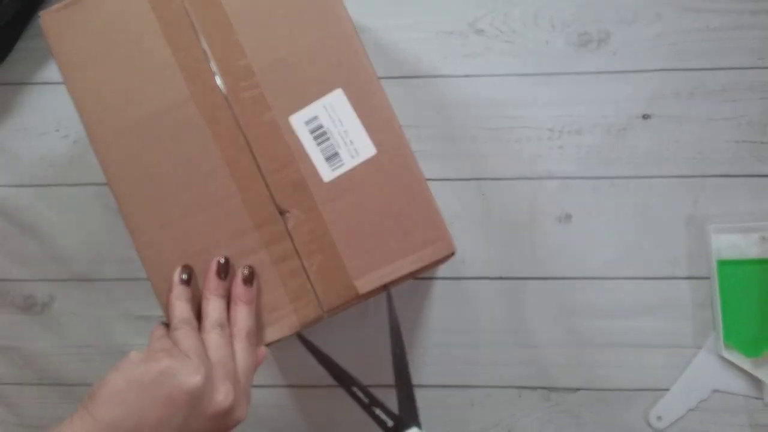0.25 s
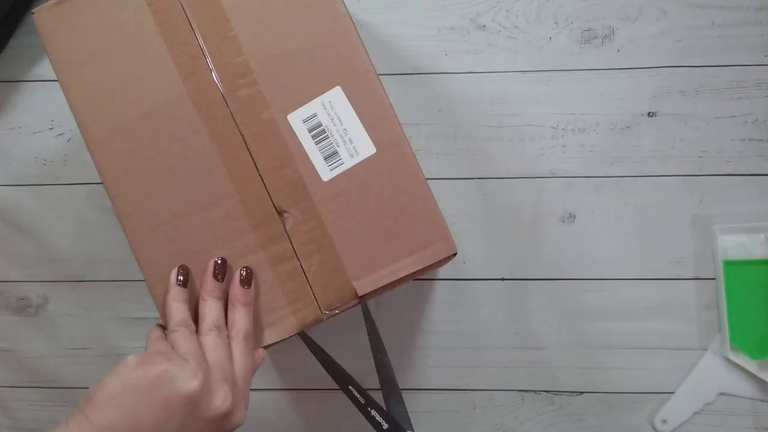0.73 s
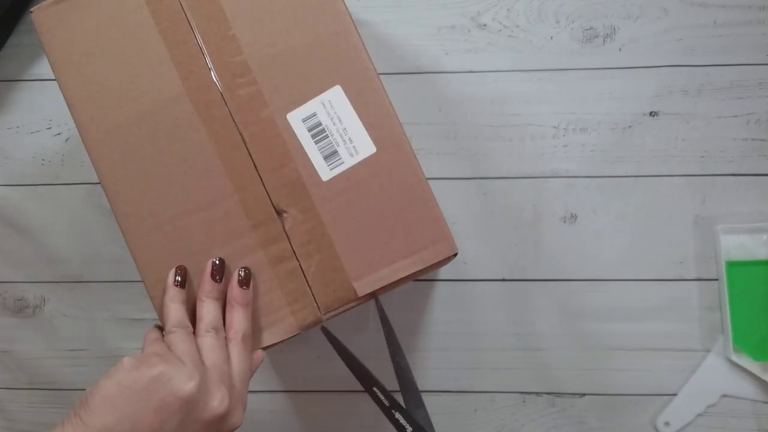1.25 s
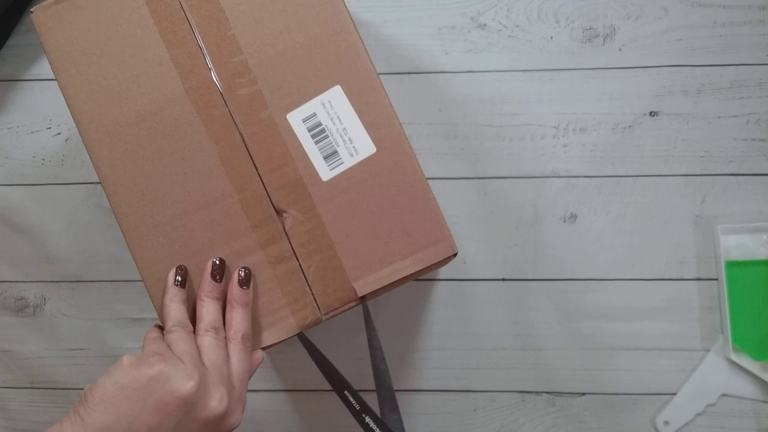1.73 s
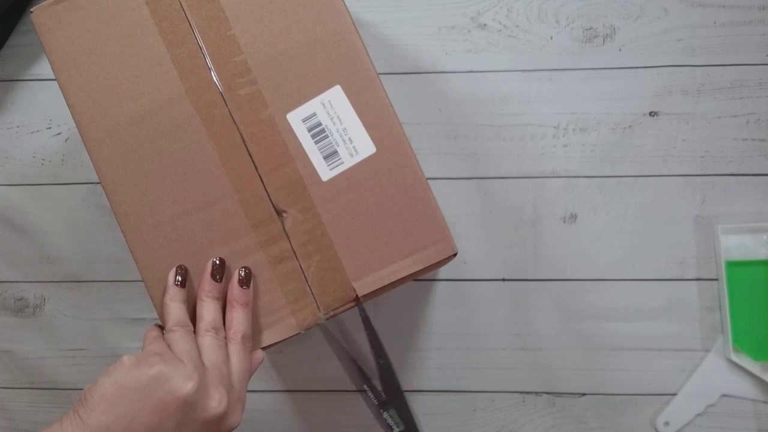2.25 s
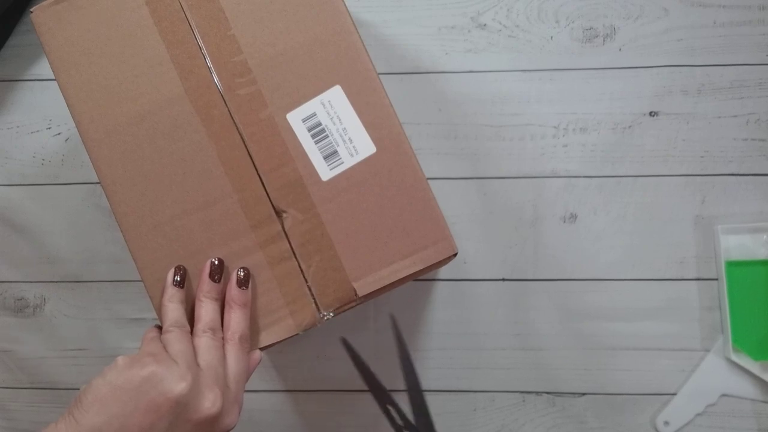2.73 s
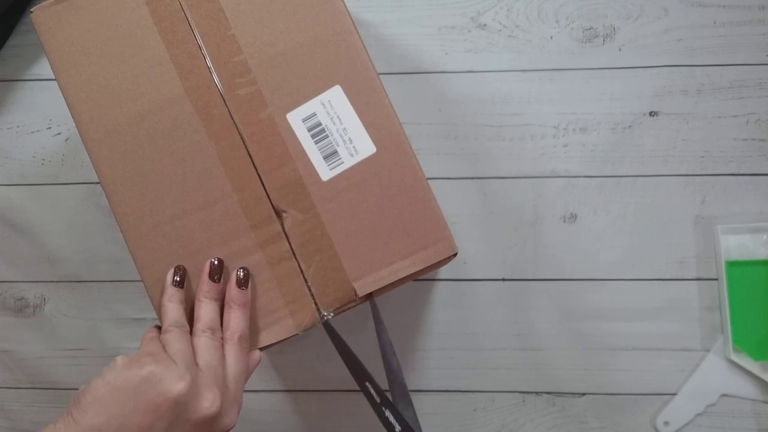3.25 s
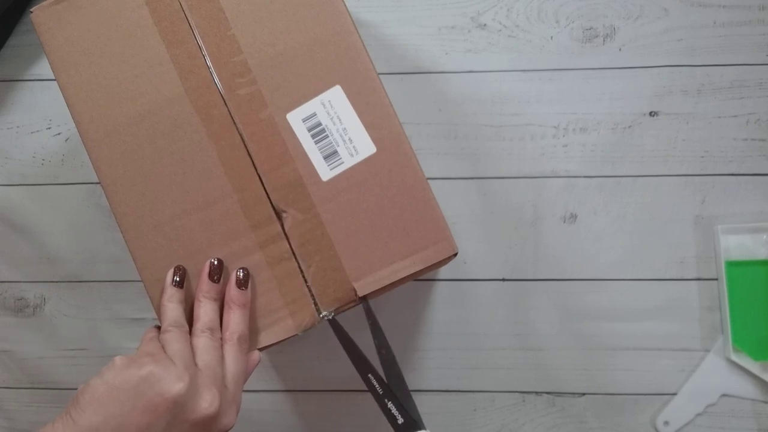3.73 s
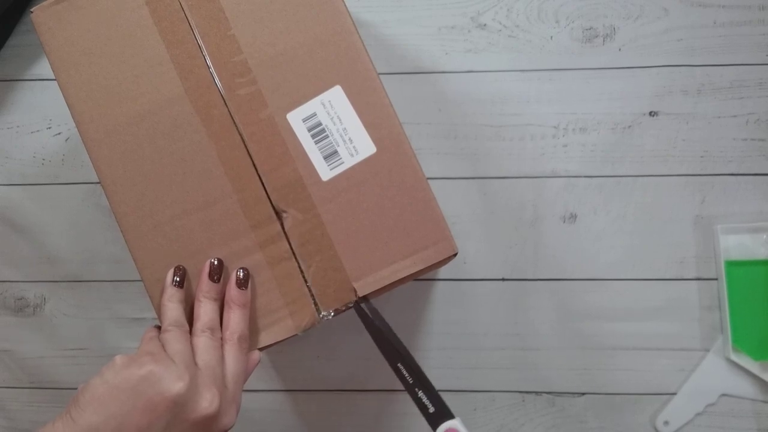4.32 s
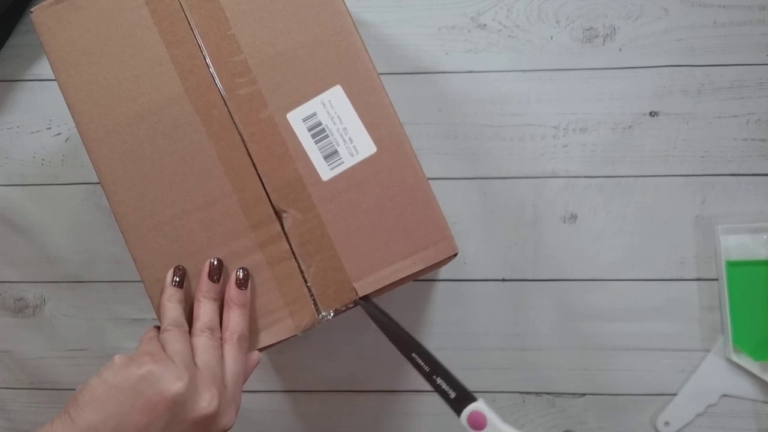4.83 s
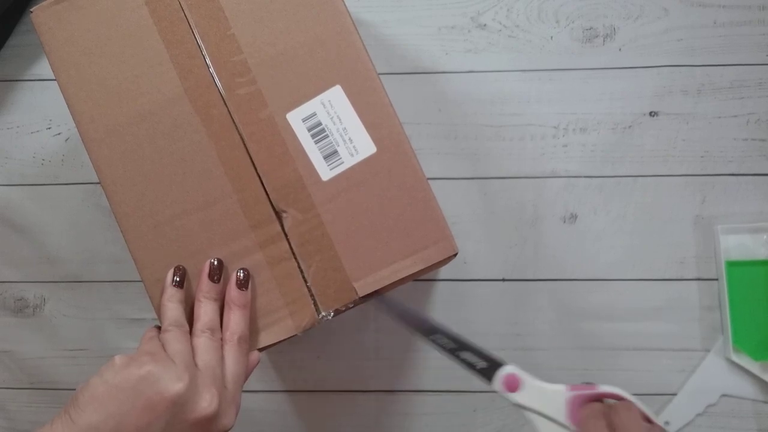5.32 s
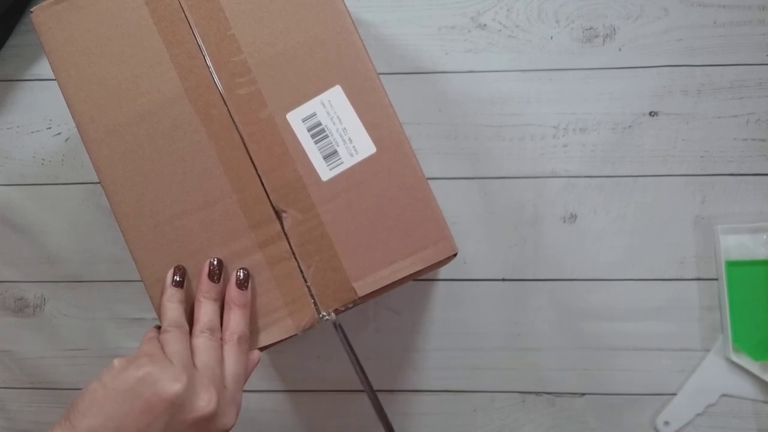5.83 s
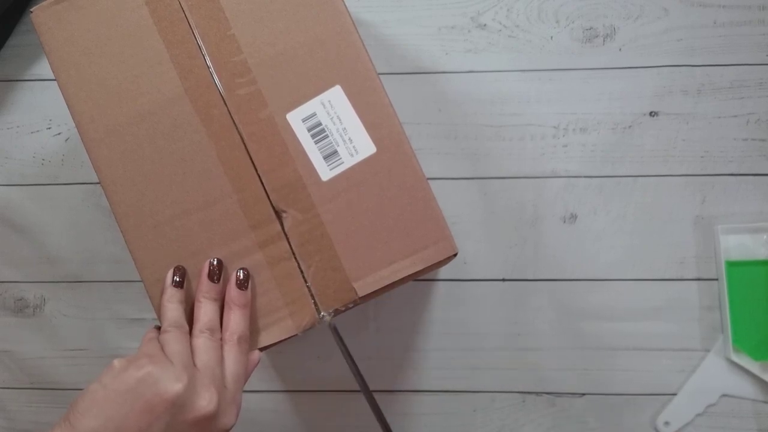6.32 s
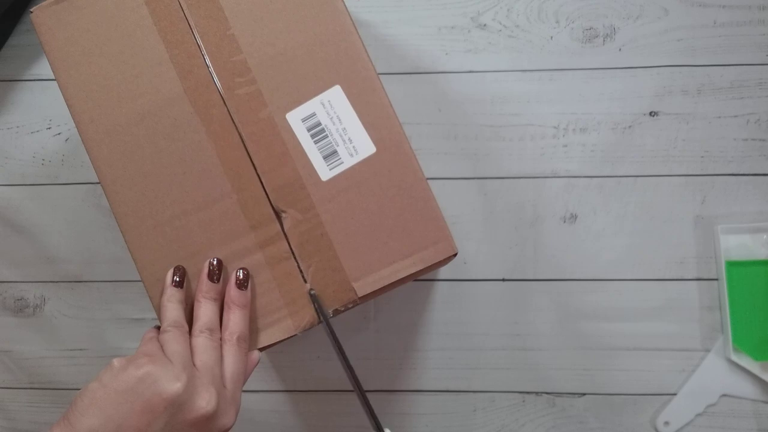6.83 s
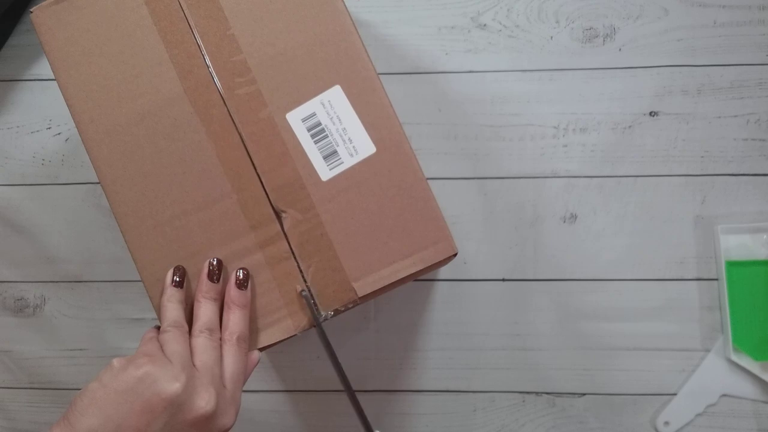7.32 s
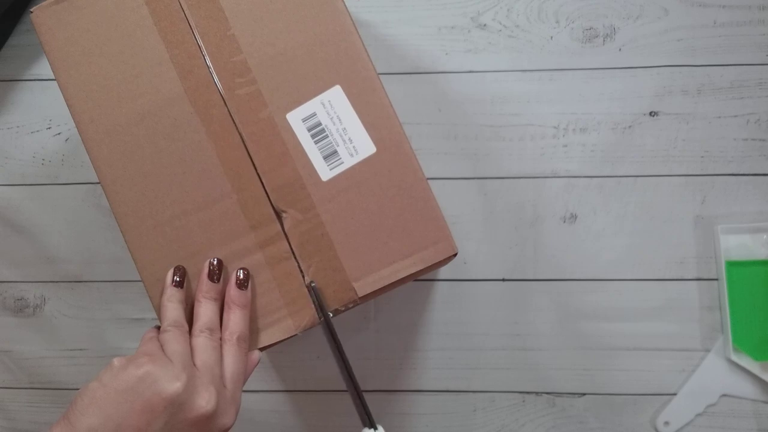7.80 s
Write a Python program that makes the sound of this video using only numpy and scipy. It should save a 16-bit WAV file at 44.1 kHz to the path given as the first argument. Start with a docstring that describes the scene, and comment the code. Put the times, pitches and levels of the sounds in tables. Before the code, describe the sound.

Sparse, irregular cutting at a cardboard box: bright metallic snips with tiny chatter, gritty snaps of tape, blunt hollow thuds and faint rubbing. Activity is strongest in the first half, then thins to isolated blade ticks and fine seam rasps. Close, dry indoor pickup with light hiss, short room reflections and a muffled engine rising and shifting outside.

```python
"""Scissors snip and slit the packing tape of a cardboard box, close up in a small room.
Steel blades click as short hard contacts with chatter; tape and card crunch as showers of tiny snaps.
Each force sounds through filters for box, card, cutting edge and tape, and blunt knocks ring the hollow box.
Behind them are thin squeaks, a faint rub of the hand and still air with microphone hiss.
Outside, a car pulls away through its gears: sine lines on the engine speed, a low hum through the wall."""
import sys
import numpy as np
from scipy import signal
from scipy.fft import rfft, irfft, next_fast_len
from scipy.io import wavfile
from scipy.ndimage import uniform_filter1d, map_coordinates

SR = 44100
rng = np.random.default_rng(int(sys.argv[2]) if len(sys.argv) > 2 else 0)


def dump(signal):
    """Clip the signal to [-1, 1] and save it as 16-bit WAV at the path in sys.argv[1]."""
    limited = np.clip(np.atleast_2d(signal).T, -1, 1)
    pcm = np.round(limited * 32767).astype(np.int16)
    wavfile.write(sys.argv[1], SR, pcm)


N = 355446  # length [samples]


def scissors():
    """All the cutting and rubbing strokes: each is a shower of snaps under its own pressure curve."""
    return bites() + drags() + rubs() + slides() + slits()


# the blades bite through tape and card:
# (start [s], length [s], card level [dB], edge level over card [dB])
BITE_STROKES = [(.739, 0.027, -46, -4.5), (.935, .03, -41.5, 0.5), (1.255, .02, -51, -13),
                (2.106, 0.058, -42.5, -9), (2.341, 0.023, -30.5, -3), (3.219, .05, -50, -12.5),
                (3.914, .022, -40.5, 2.5), (4.112, 0.0379, -55.5, 1.5), (5.093, .012, -52, 1)]


def bites():
    """Pressure peaks early and collapses, with a strong share of box."""
    return strokes(BITE_STROKES, rise=0.12, rate=1200, card_hz=1530, box_db=4.0, fizz_db=-8,
                   low_hz=40, sag=0.074, spread_db=4, surface=CARD_TONE)


# the blades drag through crumpling tape:
# (start [s], length [s], card level [dB], edge level over card [dB])
DRAG_STROKES = [(4.135, .1, -54.5, 0.5), (5.1, .025, -60.5, -8), (5.397, .105, -43, 0.5)]


def drags():
    """Pressure swells over a dense shower of snaps."""
    return strokes(DRAG_STROKES, rise=0.22, rate=2600, card_hz=2030, box_db=-1.5, fizz_db=-3.5,
                   low_hz=226, sag=0.14, spread_db=3, surface=CARD_TONE)


# the flat of a blade rubs the box:
# (start [s], length [s], card level [dB], edge level over card [dB])
RUB_STROKES = [(.461, 0.025, -61.5, -7), (.559, .026, -67, -3), (.628, 0.063, -72, 0.5),
               (1.05, .025, -64, -5), (1.187, 0.029, -60.5, -1.5), (1.573, 0.082, -64.5, -12.5),
               (1.875, 0.06, -75, -2.5), (1.97, 0.025, -65, -1), (2.06, 0.067, -60.5, -6),
               (2.17, .13, -64.5, -4.5), (2.31, .04, -56.5, -2.5), (3.48, .04, -65, -2),
               (3.713, 0.022, -68, 3), (3.84, 0.096, -70, -0.5), (4.113, .12, -56.5, -10),
               (4.304, .166, -71.5, -6), (4.64, .07, -73.5, 2), (6.226, .024, -75.5, 0),
               (7.297, 0.068, -70.5, 1), (7.42, .05, -72, -5)]


def rubs():
    """Dull, sparse snaps of very uneven size, heard mostly through the box."""
    return strokes(RUB_STROKES, rise=0.22, rate=1200, card_hz=1100, box_db=6.5, fizz_db=-4.0,
                   low_hz=171, sag=0.28, spread_db=5.5, surface=CARD_TONE)


# one blade slides over the other:
# (start [s], length [s], card level [dB], edge level over card [dB])
SLIDE_STROKES = [(.675, 0.029, -67, 11), (2.484, .022, -42.5, 2.5), (3.413, 0.046, -71, 9.5),
                 (3.529, 0.032, -57, 11), (5.644, .03, -68.5, 14.5)]


def slides():
    """Pressure swells to the middle of the stroke and fades; the snaps are fine and even."""
    return strokes(SLIDE_STROKES, rise=.5, rate=3000, card_hz=2100, box_db=-3, fizz_db=-10,
                   low_hz=200, sag=0.079, spread_db=2.5, surface=CARD_TONE)


# one blade slits along the seam:
# (start [s], length [s], card level [dB], edge level over card [dB])
SLIT_STROKES = [(6.592, .13, -56.5, 0.5), (6.71, .21, -57.5, -7.5), (7.297, 0.17, -66.5, -6),
                (7.81, .06, -57.5, -3), (7.94, .02, -66, -6)]
# rasp of the taut tape over the seam: (frequency [Hz], relative level per Hz [dB])
SEAM_TONE = [(400, -21.5), (750, 13), (1100, 5.5), (1500, -2.5), (1750, -6), (2100, -7.5), (2400, 4.5),
             (2750, 5), (3080, -7), (3500, 3.5), (4000, -8.5), (6500, -27)]


def slits():
    """A fine, fast rasp through the taut tape that starts at once and tires."""
    return strokes(SLIT_STROKES, rise=0.028, rate=4500, card_hz=2060, box_db=-7, fizz_db=-7.5,
                   low_hz=130, sag=0.32, spread_db=4, surface=SEAM_TONE)


def strokes(rows, rise, rate, card_hz, box_db, fizz_db, low_hz, sag, spread_db, surface,
            hiss=0.01276, release=.004, count=3):
    """Fibres and tape give way in tiny uneven snaps at count spots; the faster they come, the more steel hiss.

    Pressure peaks after the share rise of a stroke and sags to the share sag, then lets go in release [s].
    rate is snaps per second; box_db is over the card, fizz_db over the edge.
    A light touch cannot move the box below low_hz."""
    out = np.zeros(N)
    light = signal.butter(2, low_hz, "highpass", fs=SR, output="sos")
    for start, length, card_db, edge_db in rows:
        t = np.arange(0, length + release, 1 / SR)
        pressure = np.interp(t, [0, min(rise, 1) * length, length, length + release], [0, 1, sag, 0])
        levels = card_db + np.array([box_db, 0, edge_db, edge_db + fizz_db])
        for spot in range(count):
            chance = rng.random(len(t))
            size, sign, slide = rng.standard_normal((3, len(t)))
            snaps = (chance < rate / count / SR) * np.sign(sign) * amp(spread_db * size)
            force = pressure * (unit(snaps) + hiss * np.sqrt(abs(rate)) * slide)
            # the spots share the energy of the pressure curve
            force *= np.linalg.norm(pressure) / np.linalg.norm(force) / np.sqrt(count)
            sound = radiate(signal.sosfilt(light, force), card_hz, levels, surface)
            add(out, start, in_room(sound))
    return out


# blades meeting and tape snapping:
# (time [s], card centre [Hz], edge level [dB], card level over edge [dB], tape fizz level over edge [dB])
BLADE_CLICKS = [(.163, 3700, -39, -9, 0), (0.171, 3930, -21.5, -9, -6), (.745, 1460, -32, 0, -4),
                (0.7758, 1700, -30, -12, -12), (.8091, 2450, -31.5, -8, -9),
                (1.235, 2690, -26, -16.5, -11.5), (2.3505, 1600, -22, -10, -10),
                (2.3997, 2000, -33, -1.5, -9), (3.224, 2080, -44.5, 0, -15), (3.916, 2500, -30.5, -11, 0),
                (3.9239, 2430, -38, 7.5, -10), (4.134, 1700, -40.5, -3, -15), (4.3095, 1000, -52.5, 0, -4),
                (4.348, 1000, -51, -11, -6), (4.405, 1117, -51.5, -2, -5), (4.5926, 1915, -53, -7, -1),
                (4.649, 2300, -54.5, -5, 3), (4.9451, 1770, -39.5, -2.5, -9),
                (5.0915, 2400, -42.5, -8, 3.5), (5.358, 1690, -57.5, -1, 1.5),
                (5.6145, 1914, -46.5, -26, -7), (5.715, 4130, -31, -2, -11.5), (5.912, 4000, -47, -8, -19),
                (6.0208, 2600, -54.5, -13, -20), (6.124, 1430, -47, -20, -14),
                (6.937, 1800, -35.5, -12.5, -9.5), (7.0591, 2480, -58.5, -0.5, -15),
                (7.7994, 2370, -36, -14, -13.5)]


def clicks(stagger_s=.0006, loss_db=6, count=3):
    """The blades touch at count spots in quick succession, each more weakly."""
    out = np.zeros(N)
    shares = amp(-loss_db * np.arange(count))
    shares = shares / np.linalg.norm(shares)
    for s, card_hz, edge_db, card_db, fizz_db in BLADE_CLICKS:
        levels = edge_db + np.array([card_db, 0, fizz_db])
        for spot, share in enumerate(shares):
            add(out, s + stagger_s * spot, share * click(card_hz, levels))
    return out


def click(card_hz, levels, t60=0.0085, chatter=.65):
    """A hard first contact and a few milliseconds of chatter, through card, edge and tape fizz."""
    t = np.arange(SR // 40) / SR
    fade = amp(-60 * t / t60)
    force = chatter * fade * rng.standard_normal(len(t)) / np.linalg.norm(fade)
    force[0] += 1
    force = force * np.linalg.norm(fade) / np.linalg.norm(force)
    return in_room(radiate(force, card_hz, levels), early_db=-6, late_db=-7)


# the tape crackles while the closed blades twist under it
CRACKLE_START_S, CRACKLE_END_S, CRACKLE_RATE = 4.3, 4.85, 44  # [s], [s], ticks per second


def crackle(card_hz=1700, card_db=-74, edge_db=-65, fizz_db=-61, spread_db=3):
    """Strained tape lets go in faint ticks at uneven intervals."""
    out = np.zeros(N)
    for s in np.arange(CRACKLE_START_S, CRACKLE_END_S, 1 / CRACKLE_RATE):
        levels = np.array([card_db, edge_db, fizz_db]) + spread_db * rng.normal()
        add(out, s + rng.random() / CRACKLE_RATE, click(card_hz, levels))
    return out


# thin squeaks of a blade sliding slowly: (start [s], end [s], pitch [Hz], level [dB])
BLADE_SQUEAKS = [(1.242, 1.59, 1630, -74.5), (6.123, 6.138, 1440, -64), (6.366, 6.641, 1573, -76)]


def squeaks(width_hz=90):
    """Noise through a narrow resonance swells and fades as a wavering tone."""
    out = np.zeros(N)
    for start, end, hz, db in BLADE_SQUEAKS:
        swell = np.sqrt(np.hanning(round((end - start) * SR)))
        rub = swell * rng.standard_normal(len(swell))
        add(out, start, amp(db) * signal.fftconvolve(rub, ring([(hz, width_hz, 0)])))
    return out


# bumps on the box: (time [s], centre of the blow [Hz], level [dB])
BOX_KNOCKS = [(.174, 490, -36), (.176, 147, -47), (.294, 310, -53.5), (.746, 343, -33), (.94, 362, -28),
              (.945, 140, -38), (1.259, 544, -48), (1.627, 334, -51.5), (1.985, 338, -56),
              (2.347, 505, -26.5), (2.356, 250, -33), (2.477, 476, -41), (2.99, 265, -46),
              (3.229, 304, -41.5), (3.723, 298, -47.5), (3.92, 141, -35.5), (3.925, 290, -40),
              (4.116, 513, -43), (4.175, 547, -45.5), (4.664, 283, -53.5), (4.944, 523, -52.5),
              (5.949, 280, -44), (6.02, 290, -60.5), (6.084, 290, -61.5), (6.939, 420, -54)]


def knocks(octaves=0.42, length=0.0046, blunt_hz=1300):
    """A blunt push rings the box modes near its own centre, with the energy of length [s] at its level."""
    out = np.zeros(N)
    blunt = signal.butter(2, blunt_hz, fs=SR, output="sos")
    for s, centre_hz, db in BOX_KNOCKS:
        modes = [(hz, width, level - 6 * (np.log2(hz / centre_hz) / octaves) ** 2)
                 for hz, width, level in touched(BOX_MODES, spread_db=1.5, detune=0.018)]
        thud = amp(db) * np.sqrt(length * SR) * signal.sosfilt(blunt, ring(modes))
        add(out, s, in_room(thud, early_db=-7.5, late_db=-8.5))
    return out


# panels and air of the box: (frequency [Hz], width [Hz], relative level [dB])
BOX_MODES = [(132.7, 39, -4.5), (191, 42, -8), (260.8, 38, -1.5), (347, 62, -4), (397, 95, -7),
             (519, 42.8, 0), (570, 73, -4), (676, 100, -5), (845, 80, -7)]
# stiff card near the blade: (frequency [Hz], relative level per Hz [dB])
CARD_TONE = [(400, -31.5), (850, 7.5), (1130, 4.5), (1330, -2), (1550, -1), (1800, -2.5), (2100, -2.5),
             (2550, -2.5), (3000, -1.5), (3400, -0.5), (4200, -1), (6500, -37)]
# bright rasp of the cutting edge: (frequency [Hz], relative level per Hz [dB])
EDGE_TONE = [(1500, -42), (3600, -28.5), (4400, -11), (5300, -4.5), (6100, -1.5), (6700, 2), (7300, -2.5),
             (8000, -15), (9000, -24), (11500, -39)]
# fizz of the tape: (frequency [Hz], relative level per Hz [dB])
FIZZ_TONE = [(5000, -40.5), (8000, -7), (9200, -5), (11000, -1), (13000, -1.5), (16000, -5)]


def radiate(force, card_hz, levels, surface=CARD_TONE, octaves=1.1):
    """A contact force sounds through box, card, edge and tape fizz; with three levels the box stays silent.

    The stiffer the spot under the blade, the higher the card sounds."""
    card = [(hz, db - 6 * (np.log2(hz / card_hz) / octaves) ** 2) for hz, db in surface]
    paths = [ring(touched(BOX_MODES, spread_db=1.5, detune=0.019)),
             colour(card, ripple_db=1.64),
             colour(EDGE_TONE, ripple_db=2.5),
             colour(FIZZ_TONE, ripple_db=2.0)]
    out = 0
    for db, path in zip(levels, paths[-len(levels):]):
        part = signal.fftconvolve(force, path)
        out = out + amp(db) * part * np.linalg.norm(force) / np.linalg.norm(part)
    return out


def touched(modes, spread_db, detune):
    """Each point of contact drives the modes at other strengths and bends them a little."""
    return [(hz * np.exp(detune * rng.normal()), width, db + spread_db * rng.normal())
            for hz, width, db in modes]


# late decay of the room: (frequency [Hz], time to fall 60 dB [s])
ROOM_DECAY = [(150, 0.4), (600, 0.32), (2500, 0.37), (7000, 0.3), (15000, 0.21)]


def in_room(x, early_db=-3, early_t60=0.13, late_db=-6, gap=.002):
    """Table and near walls answer after gap [s] while the room dies away; each call draws a new pattern."""
    hz, t, z = signal.stft(rng.standard_normal((2, SR // 2)), SR, nperseg=256)
    early = amp(-60 * t / early_t60) * np.ones((len(hz), 1))
    late = amp(-60 * t / along(ROOM_DECAY, hz)[:, None])
    tails = signal.istft(z * np.array([early, late]), SR, nperseg=256)[1]
    answer = amp([early_db, late_db]) @ (tails / np.linalg.norm(tails, axis=1)[:, None])
    return signal.fftconvolve(x, np.concatenate([[1], np.zeros(round(gap * SR)), answer]))


def hand(level_db=-73.5, rest_db=-6):
    """Fingers and blades rub faintly on the card as coloured noise, easing off from 4.4 to 5 s."""
    # (frequency [Hz], relative level per Hz [dB])
    rub = noise([(100, 2), (260, -14.5), (600, -2.5), (1000, -8.5), (1800, -13.5), (3000, -16.0),
                 (5000, -22.5), (6800, -10.5), (9000, -25.5), (16000, -21.5)])
    effort_db = curve([(4.4, 0), (5, rest_db)])
    uneven_db = 2.2 * wobble(14)
    return amp(level_db + effort_db + uneven_db) * rub


# the engine climbs in each gear and drops at the two changes:
# (time [s], cycles of two crank turns [per s])
ENGINE_SPEED = [(0, 12.2), (.85, 14.8), (1.55, 18), (2.1, 13.3), (2.65, 12.9), (4.4, 19), (5.4, 21.8),
                (6.75, 25.2), (7.05, 17), (8.06, 18.4)]
# loudness of the engine before the car's overall trim: (time [s], level [dB])
ENGINE_LOUDNESS = [(0.0, -62), (0.45, -59.5), (1.46, -64.5), (1.88, -60), (2.62, -61.5), (3.5, -55.5),
                   (4.74, -66.5), (5.03, -64.5), (5.7, -79), (6.84, -72), (7.56, -73), (8.06, -77)]
# lines made by uneven firing: (multiple of the cycle rate, mean relative level [dB])
FIRING_LINES = [(3, 0), (4, -20), (5, -1), (6, -13), (7, -23), (8, -1), (9, -16.5), (11, -7.5), (13, -3),
                (14, -16), (16, -4.5)]
# what the wall lets through: (frequency [Hz], gain [dB])
WALL_GAIN = [(30, -27), (50, -13), (75, 1), (115, 1), (138, -2.5), (160, -14.5), (225, -11), (290, -39.5),
             (600, -46)]


def car(level_db=1.0, rumble_db=-22, waver_db=2, sway_rate=3):
    """Exhaust lines ride on the engine speed and sway at random; the wall keeps only the bass."""
    phase = 2 * np.pi * np.cumsum(curve(ENGINE_SPEED)) / SR
    lines = np.zeros(N)
    for multiple, db in FIRING_LINES:
        swell = amp(db + waver_db * wobble(sway_rate))
        lines += swell * np.sin(round(multiple) * phase + 2 * np.pi * rng.random())
    hum = filtered(lines, lambda hz: amp(along(WALL_GAIN, hz)))
    hum /= np.sqrt(abs(uniform_filter1d(hum ** 2, SR // 2)) + 1e-12)  # rms 1 at every engine speed
    rumble = amp(rumble_db) * noise(WALL_GAIN)
    return amp(curve(ENGINE_LOUDNESS) + level_db) * (hum + rumble)


# still air of the room and microphone hiss: (frequency [Hz], relative level per Hz [dB])
AIR_TONE = [(25, -11), (60, 9.5), (150, 4.5), (300, 2.5), (600, -3.5), (1000, -6.5), (2000, -7.5),
            (3300, -10), (5000, -15), (6800, -29), (9000, -20), (12000, -18.5), (16000, -15.5)]


def air(level_db=-70.5):
    """Still air and hiss: steady coloured noise."""
    return amp(level_db) * noise(AIR_TONE)


def amp(db):
    """Decibels to gain."""
    return 10 ** (np.asarray(db) / 20)


def unit(x):
    """x at rms 1."""
    return x / np.sqrt(np.mean(x ** 2) + 1e-20)


def along(points, hz):
    """(frequency [Hz], value) points read on a log axis."""
    f, v = np.transpose(points)
    return np.interp(np.log(hz + 1), np.log(f + 1), v)


def curve(rows):
    """(time [s], value) rows as one value per sample."""
    return np.interp(np.arange(N) / SR, *np.transpose(rows))


def wobble(rate):
    """A smooth random curve, rate knots a second."""
    knots = rng.standard_normal(int(N * rate / SR) + 4)
    return map_coordinates(knots, [np.arange(N) * rate / SR])


def add(track, s, x):
    """Mix x into the track at time s [s]."""
    part = track[..., max(round(s * SR), 0):][..., :x.shape[-1]]
    part += x[..., :part.shape[-1]]


def filtered(x, response):
    """x times a response of frequency."""
    size = next_fast_len(N + SR // 2)
    return irfft(rfft(x, size) * response(np.fft.rfftfreq(size, 1 / SR)), size)[..., :N]


def noise(points):
    """Coloured noise of rms 1."""
    return unit(filtered(rng.standard_normal(N), lambda hz: amp(along(points, hz))))


def ring(modes, size=8192):
    """Impulse response of (frequency [Hz], width [Hz], level [dB]) resonances, energy 1."""
    f = np.fft.rfftfreq(size, 1 / SR)
    response = 0
    for k, (centre, width, db) in enumerate(modes):
        resonance = 1j * f * width / (centre * centre - f * f + 1j * f * width)
        response = response + (-1) ** k * amp(db) * resonance  # neighbours in opposite phase
    h = irfft(response)
    return h / np.linalg.norm(h)


def colour(points, ripple_db, size=8192):
    """Causal impulse response of a spectrum with chance ripples, energy 1."""
    f = np.fft.rfftfreq(size, 1 / SR)
    ripple = map_coordinates(rng.standard_normal(64), [f / f[-1] * 60], mode="nearest")
    # folding the cepstrum gives minimum phase
    cepstrum = irfft(np.log(amp(along(points, f) + ripple_db * ripple)))
    cepstrum[1:size // 2] *= 2
    cepstrum[size // 2 + 1:] = 0
    h = irfft(np.exp(rfft(cepstrum)))
    return h / np.linalg.norm(h)


def scene():
    """Scissors and box over the quiet room, with the car outside."""
    cutting = scissors() + clicks() + crackle() + squeaks()
    return (cutting + knocks() + hand() + car() + air())[None]


def record(dry, low_hz=44, top_hz=16200):
    """The recorder thins the bass below low_hz and cuts steeply above top_hz."""
    body = signal.sosfilt(signal.butter(2, low_hz, "highpass", fs=SR, output="sos"), dry)
    return filtered(body, lambda hz: 1 / (1 + (hz / top_hz) ** 120))


dry = scene()
out = record(dry)
dump(out)
```